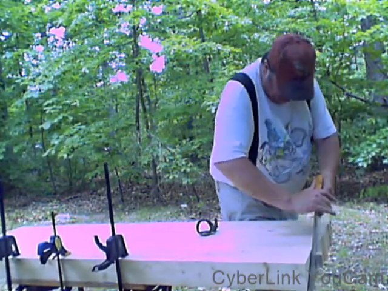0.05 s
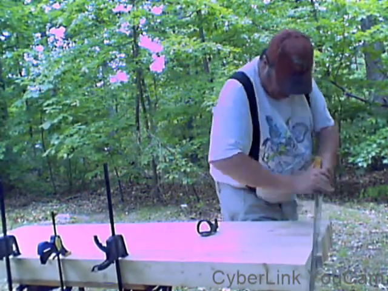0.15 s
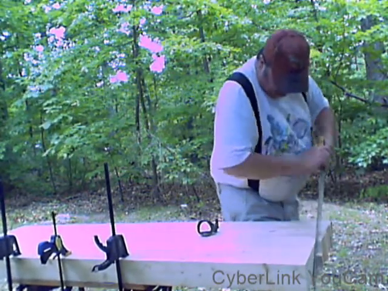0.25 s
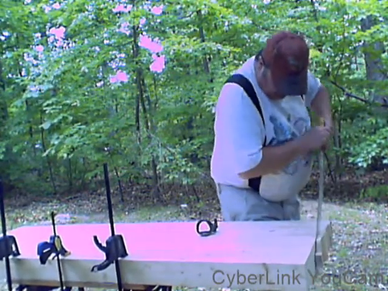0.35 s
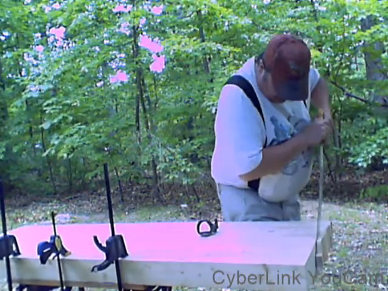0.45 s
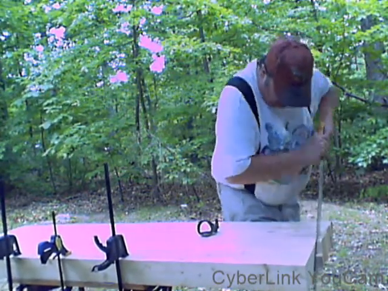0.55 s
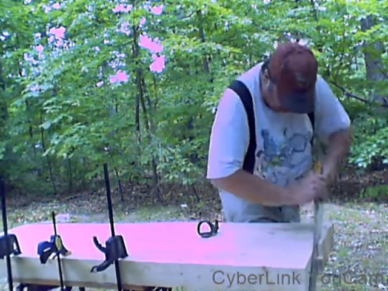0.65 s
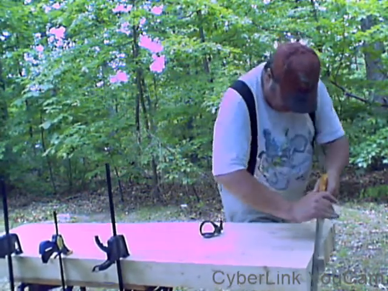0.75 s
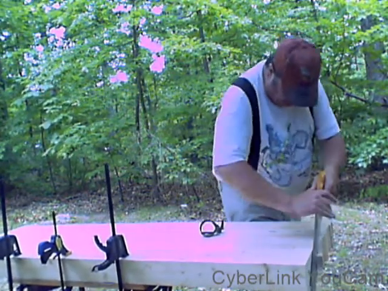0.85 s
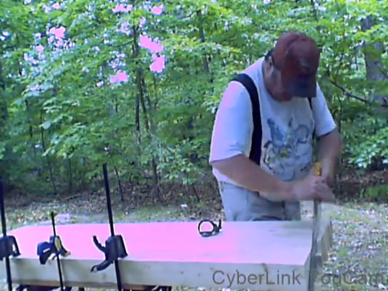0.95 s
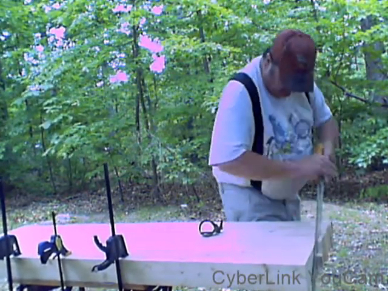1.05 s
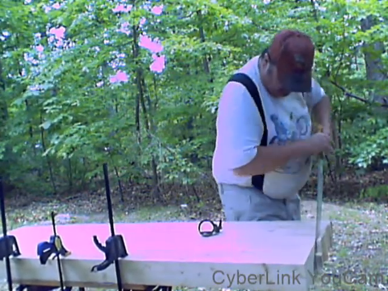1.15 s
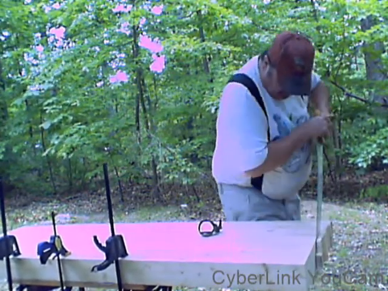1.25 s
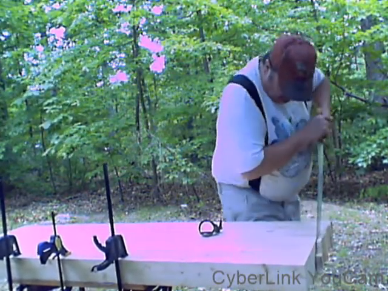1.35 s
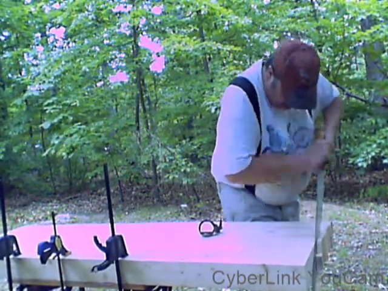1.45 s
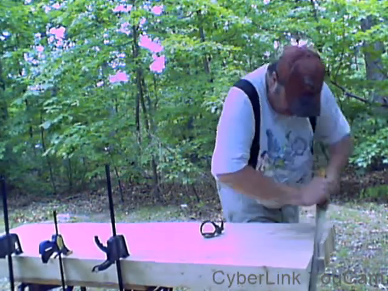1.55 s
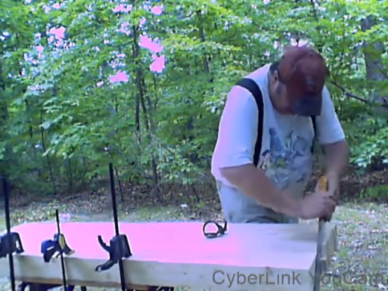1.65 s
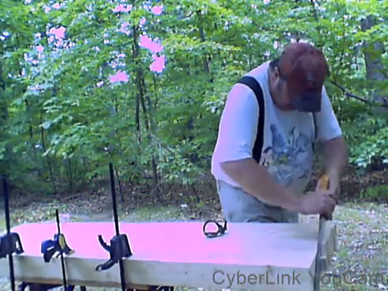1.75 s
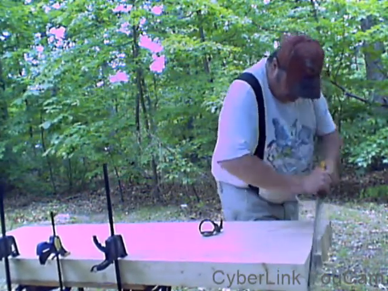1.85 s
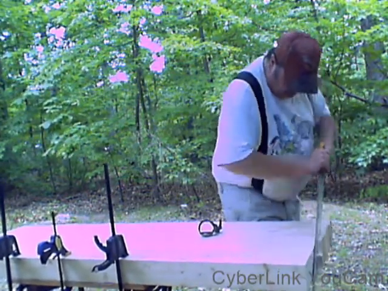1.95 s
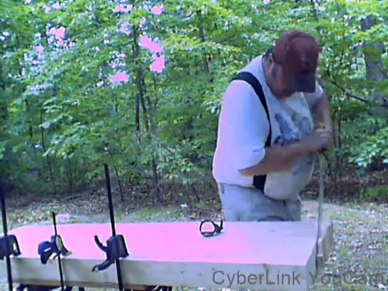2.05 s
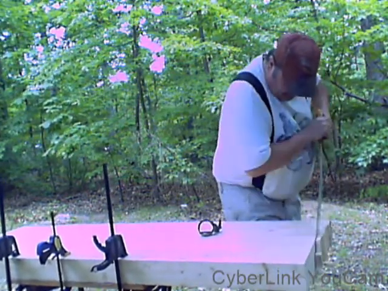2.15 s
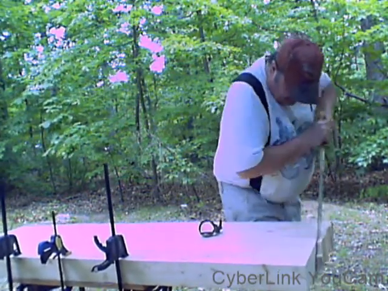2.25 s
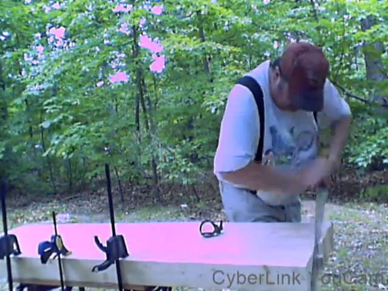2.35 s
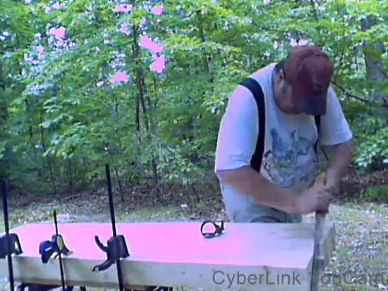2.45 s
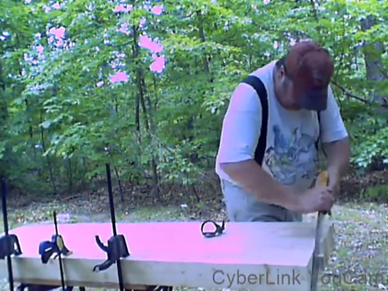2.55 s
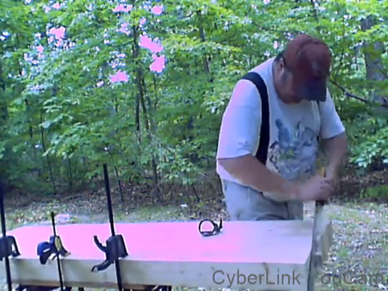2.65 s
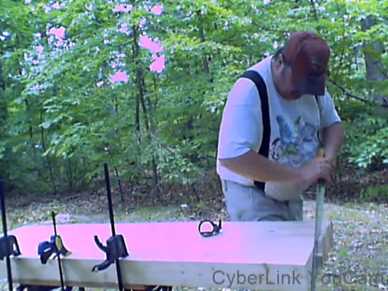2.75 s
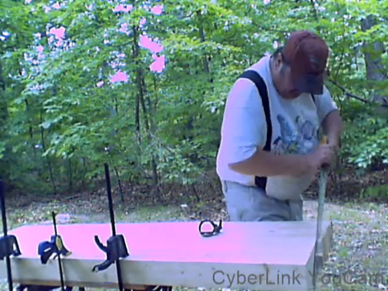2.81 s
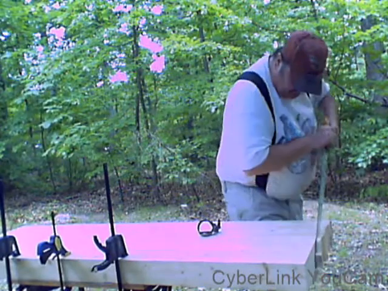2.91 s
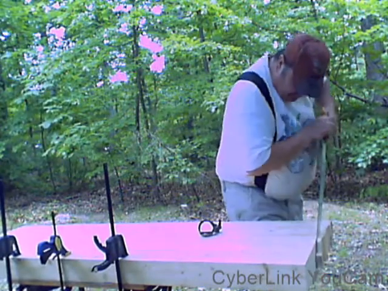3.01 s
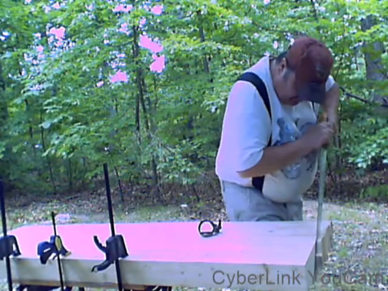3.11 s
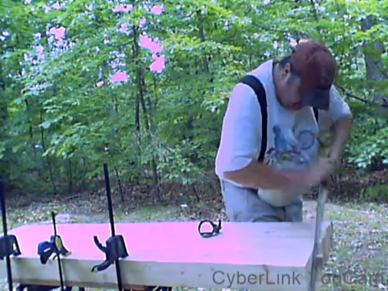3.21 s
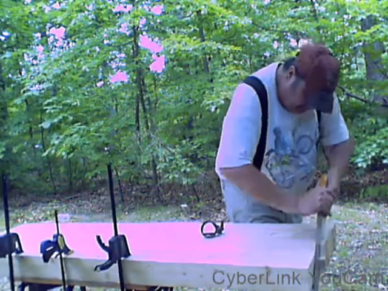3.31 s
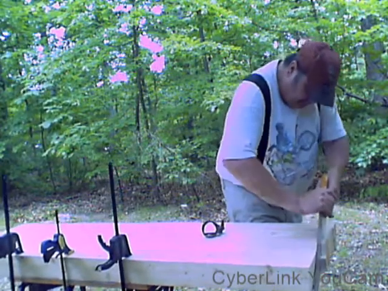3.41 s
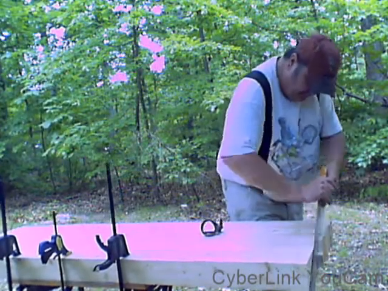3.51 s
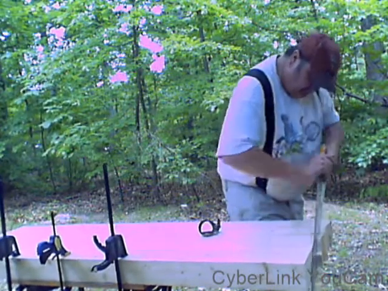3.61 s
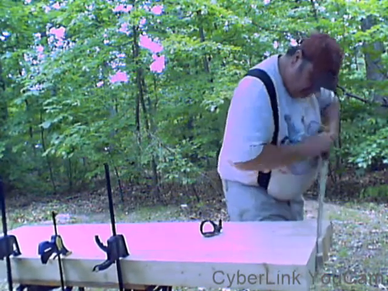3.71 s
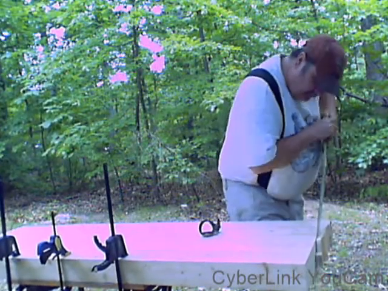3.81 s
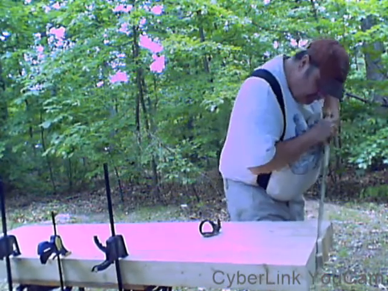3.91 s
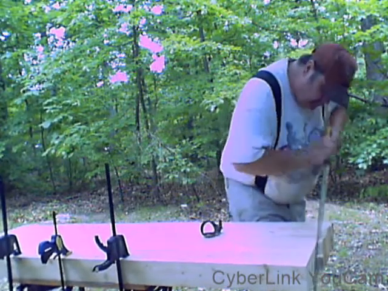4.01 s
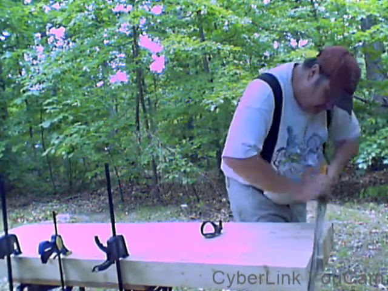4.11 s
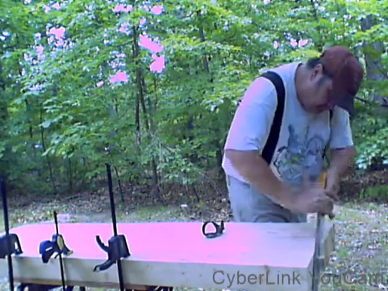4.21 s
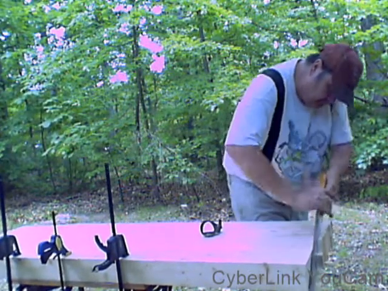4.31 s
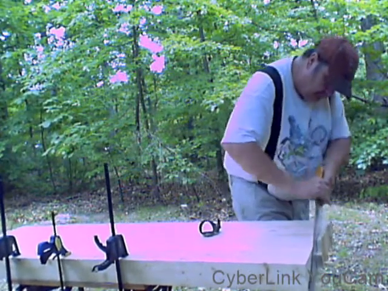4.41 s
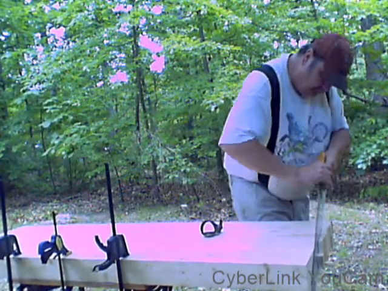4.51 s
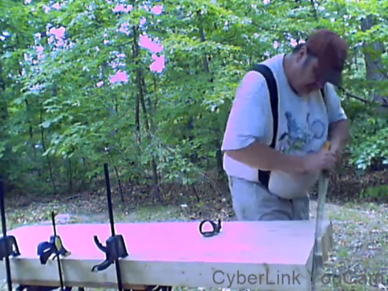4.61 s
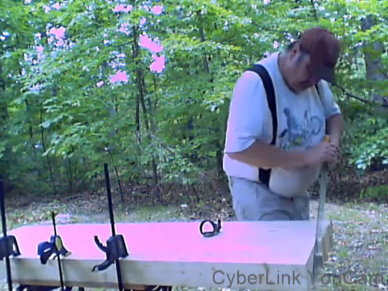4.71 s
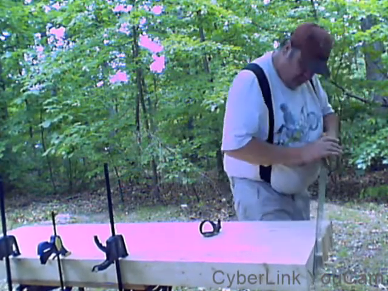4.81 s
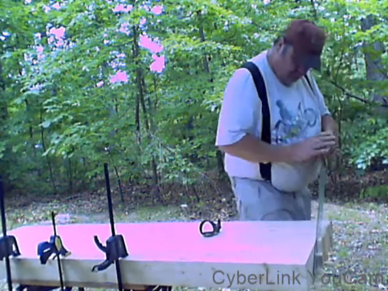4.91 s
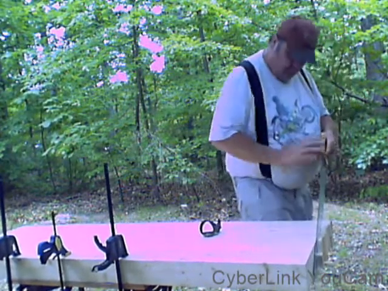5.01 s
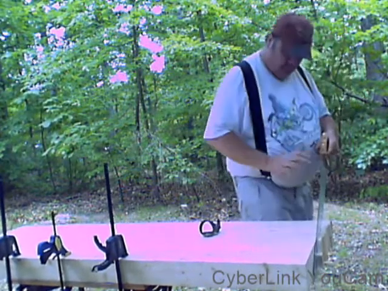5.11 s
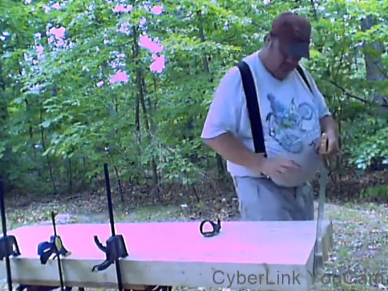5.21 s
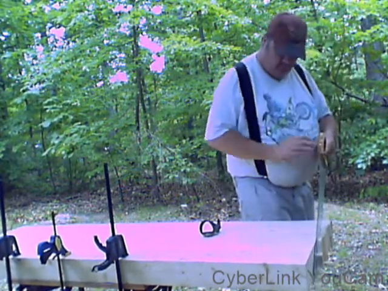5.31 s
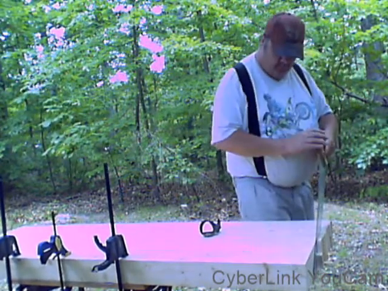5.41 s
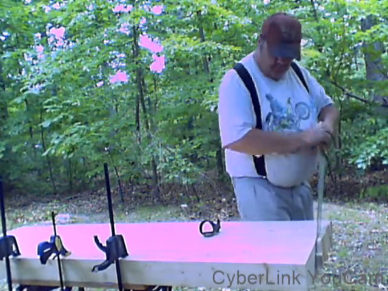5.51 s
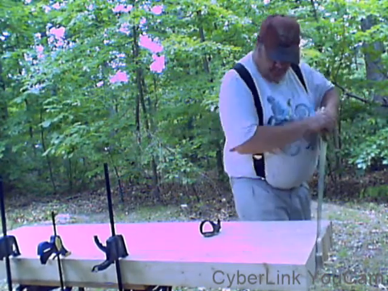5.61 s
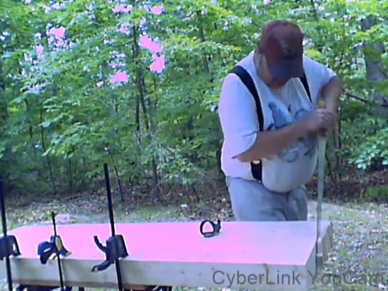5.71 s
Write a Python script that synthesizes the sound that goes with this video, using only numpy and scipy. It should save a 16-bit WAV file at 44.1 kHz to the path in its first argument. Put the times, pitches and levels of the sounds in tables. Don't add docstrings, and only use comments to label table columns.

```python
import sys
import numpy as np
from scipy import signal
from scipy.fft import rfft, irfft
from scipy.io import wavfile
from scipy.ndimage import uniform_filter1d

SR = 44100
rng = np.random.default_rng(int(sys.argv[2]) if len(sys.argv) > 2 else 0)


def materialize(psi):
    bounded = np.clip(np.atleast_2d(psi).T, -1, 1)
    quanta = np.round(bounded * 32767).astype(np.int16)
    wavfile.write(sys.argv[1], SR, quanta)


def ratio_of_db(decibels):
    return 10 ** (np.asarray(decibels, float) / 20)


N = 254012


def rms_one(x):
    return x / np.sqrt(np.mean(x ** 2) + 1e-20)


def colour(x, points):
    hz, db = np.transpose(points)
    log_hz = np.log(np.arange(N // 2 + 1) * SR / N + 1)
    return irfft(rfft(x) * ratio_of_db(np.interp(log_hz, np.log(hz), db)), N)


def resonate(x, hz, width_hz):
    r = np.exp(-np.pi * width_hz / SR)
    poles = [1, -2 * r * np.cos(2 * np.pi * hz / SR), r * r]
    return signal.lfilter([(1 - r * r) / 2, 0, (r * r - 1) / 2], poles, x + 1e-18)


def drift(hz):
    r = np.exp(-2 * np.pi * hz / SR)
    noise = rng.standard_normal(N + SR)
    return rms_one(signal.lfilter([1], [1, -2 * r, r * r], noise)[SR:])


def evened(x):
    return x / np.sqrt(uniform_filter1d(x ** 2, size=SR // 10) + 1e-12)


# (frequency [Hz], density [dB per Hz])
WOODS_SPECTRUM = [(12, -33), (20, -1.5), (32, -10.5), (47, -12), (105, -2.5), (132, -5), (198, -22),
                  (242, -23.5), (443, -10), (1210, -19.5), (1520, -23), (1860, -22.5), (2170, -25.5),
                  (5930, -30), (8230, -62.5), (10700, -104), (18100, -120)]
# (frequency [Hz], width [Hz], level [dB])
FAR_DRONE = [(51.5, 6.9, -50), (114, 22, -48)]


def woods():
    level_db = -44.5 + 0.74 * drift(5.3)
    air = ratio_of_db(level_db) * rms_one(colour(rng.standard_normal(N), WOODS_SPECTRUM))
    drone = 0
    for hz, width_hz, db in FAR_DRONE:
        drone = drone + ratio_of_db(db) * rms_one(resonate(rng.standard_normal(N), hz, width_hz))
    return air + drone


def place(stroke, t):
    return np.interp(t, stroke[:3], [-1, 0, 1])


# (start [s], fastest [s], end [s], effort [dB], evenness of speed [1-2])
PUSH = [
    (-.31, -0.146, .03, 5, 1.15),
    (0.577, 0.731, 0.9, -0.5, 1.04),
    (1.43, 1.609, 1.784, -0.8, 0.99),
    (2.32, 2.471, 2.63, 1, 1.084),
    (3.165, 3.335, 3.5, -0.6, 1.076),
    (4.025, 4.184, 4.35, -.6, 1.2),
]
# (start [s], fastest [s], end [s], effort [dB], evenness of speed [1-3])
PULL = [
    (0.071, 0.316, 0.56, 2, 1),
    (.955, 1.16, 1.389, 0.06, 1.4),
    (1.809, 2.08, 2.24, -0.5, 1.4),
    (2.68, 2.88, 3.115, 0.7, 1.3),
    (3.578, 3.768, 3.93, -0.4, 2.37),
    (4.4, 4.548, 4.962, -4.5, 0.87),
    (5.518, 5.649, 5.81, -14, 0.98),
]
# (place in stroke [-1 to 1], teeth rate [Hz])
PUSH_SPEED = [(-1, 105.), (-.7, 225.), (-.45, 340.), (-.2, 530.), (0, 615.), (.15, 580.), (.35, 465.),
              (.6, 325.), (0.96, 115.)]
PULL_SPEED = [(-1, .25), (-.65, .36), (-.35, .8), (0, 0.99), (.4, .8), (.7, .45), (1, .08)]


def blade_motion():
    t, rate_hz, pushing = np.arange(N) / SR, np.full(N, 60.), np.zeros(N)
    for row in PULL:
        now = (t > row[0]) & (t < row[2])
        top_hz = 180 / (row[2] - row[0])
        rate_hz[now] += top_hz * np.interp(place(row, t[now]), *np.transpose(PULL_SPEED))
    for row in PUSH:
        now = (t > row[0]) & (t < row[2])
        rate_hz[now] = np.interp(place(row, t[now]), *np.transpose(PUSH_SPEED))
        pushing[now] = 1
    return rate_hz, uniform_filter1d(pushing, size=SR // 50)


def stroke_gain(rows, speeds, weights, law):
    step, stop_db_per_s = 64, 299
    db, power, weight_db = law
    t, gain = np.arange(0, N + step, step) / SR, 0
    for row in rows:
        at = place(row, t)
        idle_s = np.maximum(row[0] - t, 0) + np.maximum(t - row[2], 0)
        share = np.interp(at, *np.transpose(speeds)) / np.max(speeds)
        weight = np.interp(at, *np.transpose(weights))
        level_db = row[3] + db + weight_db * weight - stop_db_per_s * idle_s
        gain = gain + ratio_of_db(level_db) * share ** (power / row[4])
    return np.interp(np.arange(N) / SR, t, gain)


PUSH_WEIGHT = [(-1, -0.63), (-.65, .4), (-0.59, -0.053), (0.15, -0.17), (0.34, 0.52), (0.52, 1),
               (0.81, 0.5), (1, -1.1)]
PULL_WEIGHT = [(-1, -0.6), (-1.3, -0.3), (0.32, -0.3), (0.62, 0.8), (0.47, 1), (1, .1)]


def layer_gain(push_law, pull_law, rest_db):
    pushes = stroke_gain(PUSH, PUSH_SPEED, PUSH_WEIGHT, push_law)
    pulls = stroke_gain(PULL, PULL_SPEED, PULL_WEIGHT, pull_law)
    return ratio_of_db(rest_db) + pushes + pulls


def teeth(turns, set_db, spread_db):
    tooth = np.floor(turns)
    size_db = set_db * (tooth % 2) + spread_db * rng.standard_normal(N)
    bites = np.diff(tooth, prepend=0) * ratio_of_db(size_db)
    return rms_one(bites - uniform_filter1d(bites, size=SR // 50))


def fibres(per_s, spread_db):
    size_db = spread_db * np.minimum(rng.exponential(1, N), 5)
    tears = rng.random(N) < per_s / SR
    return rms_one(ratio_of_db(size_db) * rng.choice([-1, 1], N) * tears)


def ring(force, modes, pushing, patchy_db):
    out = 0
    for k, (hz, width_hz, push_db, pull_db) in enumerate(modes):
        coupling_db = pushing * push_db + (2 - pushing) * pull_db + patchy_db * drift(4.8)
        mode = resonate(force * ratio_of_db(coupling_db), hz, width_hz) / np.sqrt(width_hz)
        out = out + (-1) ** k * mode
    return out * np.sqrt(SR / np.pi)


# (top-speed level [dB], power of speed, weight effect [dB])
TONE_LAW = [
    (-25.5, 3.3, 17.2),
    (-20., 4., 4.),
]
FLARE_HZ = [285, 495, 600, 995, 1215]


def whine(turns):
    first, second = (stroke_gain(PUSH, PUSH_SPEED, PUSH_WEIGHT, law) for law in TONE_LAW)
    tone = first * np.sin(2 * np.pi * turns) + second * np.sin(2 * np.pi * 2 * turns)
    tone *= ratio_of_db(3.0 * np.minimum(drift(35.0), .5))
    return .12 * tone + sum(resonate(tone, hz, 70.) for hz in FLARE_HZ)


# (frequency [Hz], width [Hz], push part [dB], return part [dB])
BODY = [(518, 110, 1, -5), (591.6, 20, 5.5, -11.5), (690, 88, -8, -0.5), (817, 9, -1.5, -9.),
        (829, 50, -6, -5), (1015.5, 39, -3, -2.5), (1203, 23, 1, -15.5), (1440, 27, -22.5, -12),
        (1523, 94, 4, -18.5), (400, 180, -4.5, -11), (1045, 78, -5.5, -3), (1490, 60, -2, -16)]
# (frequency [Hz], width [Hz], push part [dB], return part [dB])
HUM = [(160, 62, -4.5, -9), (190, 38, -6, -5.5), (239, 46, -2.5, -6.5), (287, 76, -0.5, -4.5)]
# (frequency [Hz], width [Hz], push part [dB], return part [dB])
BLADE = [(1900, 22, -4.5, -16), (2230, 29, -8.5, -5), (2310, 36, -8, -13), (2520, 56, -4, -4),
         (3000, 190, -7.5, -7.5), (3035, 38, -6, -5.5), (3980, 20, -24.5, -11.5), (4815, 110, -15, -5)]
# (frequency [Hz], density [dB per Hz])
RASP = [(180, -35.5), (300, -10), (760, -14.5), (975, 1), (1100, -15.5), (1200, -4.5), (4500, -12),
        (5850, -52), (9900, -120)]
# (frequency [Hz], density [dB per Hz])
SIZZLE = [(2060, -14.5), (3500, -12), (4130, -20), (4920, -2), (6410, -9.5), (7500, -17.5), (7910, -25.5),
          (8230, -35), (10700, -62), (18100, -120)]
# (top-speed level [dB], power of speed, weight effect [dB])
PUSH_LAW = [(-22., 1.63, 10), (-17, 2.34, 0.4), (-31, 0.54, 5.5), (-22.5, 2.43, 0.9)]
# (top-speed level [dB], power of speed, weight effect [dB])
PULL_LAW = [(-32.5, 1.93, 1), (-27, 2.24, 1.4), (-39, 1.2, 1.5), (-35, 2.02, -5)]
REST_DB = [-54., -56, -55, -64]


def saw():
    biting, rasping, humming, sizzling = map(layer_gain, PUSH_LAW, PULL_LAW, REST_DB)
    rate_hz, pushing = blade_motion()
    turns = np.cumsum(rate_hz * (1 + .02 * drift(60.0))) / SR
    regular = teeth(turns, set_db=-3.5, spread_db=6.5) * (0.28 + 0.15 * pushing)
    swell = 1 + 0.18 * np.cos(2 * np.pi * turns) + 0.1 * np.cos(np.pi * turns)
    torn = fibres(7000., spread_db=1.5) * swell * ratio_of_db(0.96 * drift(21.0))

    bite = ring(regular + 0.51 * torn, BODY, pushing, patchy_db=3.0)
    hum = ring(regular + 0.65 * torn, HUM, pushing, patchy_db=2.0)
    blade = ring(torn + 0.74 * regular, BLADE, pushing, patchy_db=2.0)
    rasp = rms_one(colour(torn, RASP)) + ratio_of_db(0.5) * blade
    sizzle = rms_one(colour(torn, SIZZLE))
    slab = biting * evened(bite) + humming * evened(hum)
    return whine(turns) + slab + rasping * evened(rasp) + sizzling * evened(sizzle)


# (time [s], peak [dB], ring [Hz], t60 [s])
TICK = [(0.112, -41, 3200., 0.043), (0.145, -27, 3000., 0.053), (0.93, -26, 4500., 0.028),
        (1.411, -30, 4700., 0.093), (1.483, -26.5, 5330, 0.074), (1.514, -18.5, 5260, 0.016),
        (1.8, -32, 3500., 0.03), (1.842, -37, 3850, 0.045), (1.863, -42, 2990, 0.027),
        (2.339, -27, 5600., 0.093), (2.365, -33, 5500., 0.03), (2.659, -32.5, 3962, 0.021),
        (2.711, -23.5, 2650., 0.045), (3.476, -22.5, 3100., 0.036), (3.555, -43, 3100., 0.046),
        (3.5785, -13, 2900, 0.028), (3.582, -19, 3560, 0.053), (4.343, -35, 5200., 0.03),
        (3.584, -11.5, 1000., 0.056)]
# (frequency [Hz], level [dB], t60 [s])
KNOCK = [(1290, -13, .05), (1930, -4, 0.084), (2210, -6.5, 0.14), (2420, -23.5, .1), (2820, 0, 0.056),
         (3100, -5, 0.05)]


def ticks():
    out, clicks = np.zeros(N), np.zeros(N)
    t = np.arange(SR // 5) / SR
    for s, db, hz, t60 in TICK:
        at = round(s * SR)
        crack = rms_one(resonate(rng.standard_normal(len(t)), hz, .7 * hz))
        out[at:at + len(t)] += crack * ratio_of_db(db - 11 - 60 * t / t60)
        clicks[at] = ratio_of_db(db)
    for hz, db, t60 in KNOCK:
        r, w = ratio_of_db(-60 / (t60 * SR)), 2 * np.pi * hz / SR
        poles = [1, -2 * r * np.cos(w), r * r]
        out += ratio_of_db(db - 12.5) * signal.lfilter([0, np.sin(w)], poles, clicks + 1e-18)
    return out


# (middle [s], length [s], frequency [Hz], level [dB])
CHATTER_SWELL = [(0.652, 0.12, 188, -33.5), (0.757, 0.13, 190., -28), (1.52, 0.076, 181, -27),
                 (1.64, 0.11, 190., -29), (2.372, 0.12, 176.5, -29.5), (3.251, 0.095, 160., -24),
                 (3.315, 0.095, 189, -22), (3.414, 0.2, 190., -32.5), (3.853, 0.088, 190., -35.5),
                 (4.068, 0.044, 179.8, -24.5), (4.165, 0.15, 190., -16), (4.565, 0.053, 190., -26.5),
                 (2.58, 0.037, 270., -30), (3.036, 0.088, 270., -34), (3.442, 0.052, 300., -27),
                 (0.855, 0.057, 290., -29),
                 (1.937, 0.064, 400., -30.5), (0.297, 0.16, 672., -25), (0.339, 0.049, 1116., -23),
                (0.754, 0.058, 975., -11.5), (0.805, 0.18, 705., -22), (0.836, 0.12, 1010., -27.5),
                (1.062, 0.039, 682, -32), (1.165, 0.1, 715., -27.5), (1.25, 0.098, 690., -30.5),
                (1.638, 0.04, 990., -14.5), (1.658, 0.041, 490., -12.5), (1.663, 0.081, 690., -28),
                (1.7, 0.069, 580., -20), (1.694, 0.041, 975., -16), (2.487, 0.1, 510., -22.5),
                (2.519, 0.059, 875., -18.5), (2.824, 0.062, 620., -27.5), (2.936, 0.079, 1000., -26),
                (3.248, 0.049, 302, -23), (3.421, 0.053, 510., -25.5), (1.718, 0.041, 348, -27),
                (3.763, 0.049, 700., -21.5), (3.829, 0.041, 1030., -24.5), (3.902, 0.072, 990., -32),
                (4.15, 0.036, 500., -17), (4.143, 0.099, 690., -19.5), (4.25, .06, 471.6, -19.5),
                (4.29, .035, 1010., -29), (4.553, 0.046, 290., -30.5), (5.663, 0.19, 1000., -41)]


def boom():
    out, waver = np.zeros(N), np.cumsum(drift(31.4)) / SR
    for middle, length, hz, db in CHATTER_SWELL:
        at = round((middle - length / 2) * SR) + np.arange(round(length * SR))
        swell = np.sin(np.pi * (at - at[0]) / len(at))
        tone = np.sin(2 * np.pi * hz * (at / SR + 0.0175 * waver[at]))
        out[at] += ratio_of_db(db - 1.0) * swell * tone
    return out * ratio_of_db(0.28 * drift(48.0))


# (time [s], level [dB])
THUMP = [
    (0.471, -40),
    (0.751, -41),
    (2.478, -32),
    (3.769, -39),
    (4.23, -32.5),
    (4.789, -31.5),
]


def thumps():
    clicks = np.zeros(N)
    for s, db in THUMP:
        clicks[round(s * SR)] = ratio_of_db(db)
    return resonate(resonate(clicks, 45., 40.), 60., 70.) * 580.0


# (start [s], length [s], slip rate [Hz], level [dB], blade ring [Hz], other ring [Hz])
SQUEAK = [
    (2.232, .042, 797., -47., 5580., 3980.),
    (2.275, .022, 793., -50., 6345., 3560.),
    (4.340, .015, 880., -38., 5280., 5280.),
    (4.412, .044, 845., -45., 2535., 5070.),
    (4.452, .02, 802., -48., 5610., 6500.),
]


def squeaks():
    out, waver = np.zeros(N), drift(60.0)
    for start, length, rate_hz, db, ring_hz, other_hz in SQUEAK:
        at, t = round(start * SR), np.arange(round(length * SR)) / SR
        slips = rate_hz * np.cumsum(1 + .012 * waver[at:at + len(t)]) / SR
        comb = sum(np.cos(2 * np.pi * k * slips + k * k) for k in range(2, 10))
        rung = resonate(comb, ring_hz, 400.) + .7 * resonate(comb, other_hz, 400.)
        swell = np.sin(np.pi * t / length) ** .7
        out[at:at + len(t)] += ratio_of_db(db - .6) * (.33 * comb + rung) * swell
    return out * ratio_of_db(3.0 * drift(80.0))


def dulled(x):
    return signal.sosfilt(signal.butter(4, 7200, fs=SR, output="sos"), x)


def scene():
    sharp = dulled(ticks() + squeaks())
    return np.tile(woods() + saw() + sharp + boom() + thumps(), (2, 1))


def top_cut(x):
    return signal.sosfilt(signal.butter(12, 8380, fs=SR, output="sos"), x)


def record(dry):
    cutoff_hz, offset = 8700, -.0042
    rounded = .95 * np.tanh(dry / .95)
    lowpass = signal.cheby2(12, 50, cutoff_hz, fs=SR, output="sos")
    return top_cut(signal.sosfilt(lowpass, rounded) + offset)


dry = scene()
out = record(dry)
materialize(out)
```